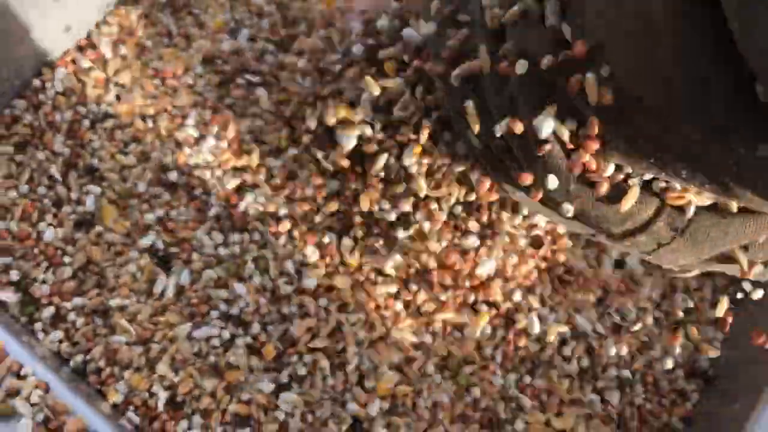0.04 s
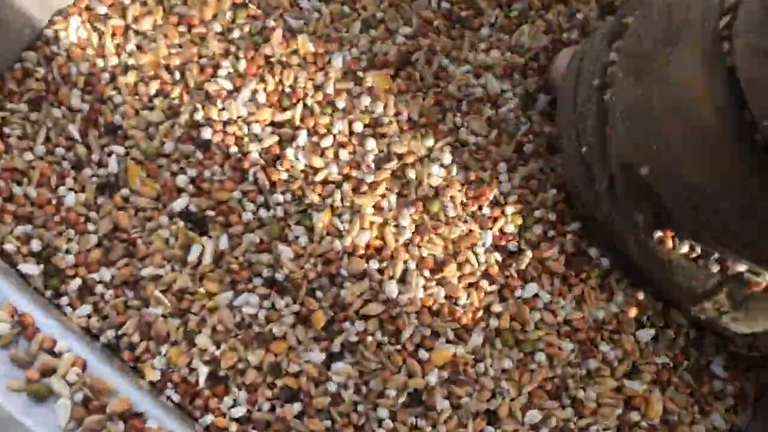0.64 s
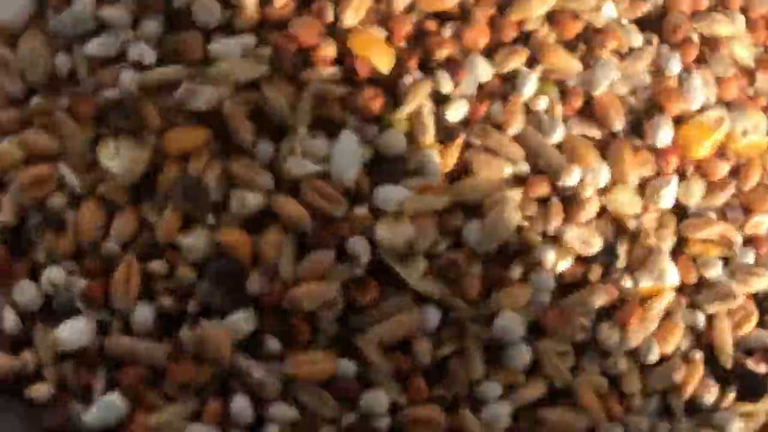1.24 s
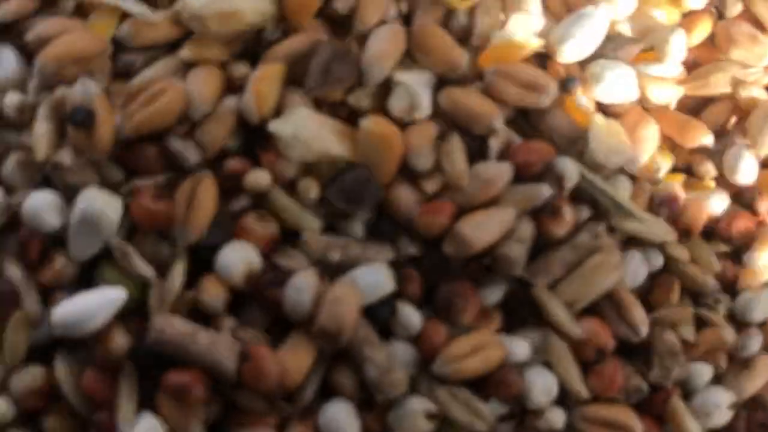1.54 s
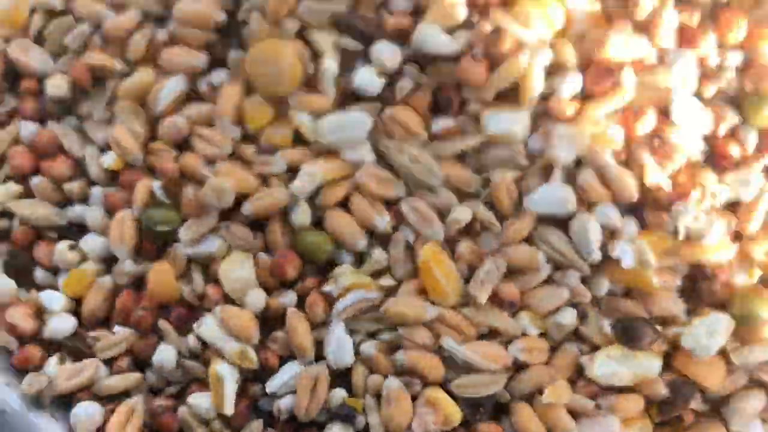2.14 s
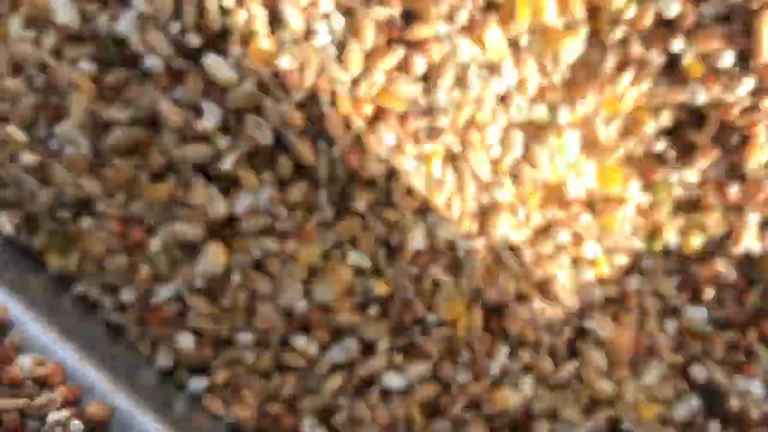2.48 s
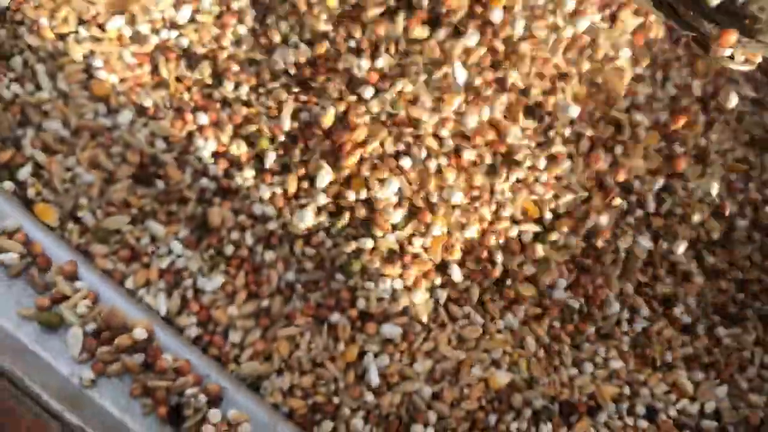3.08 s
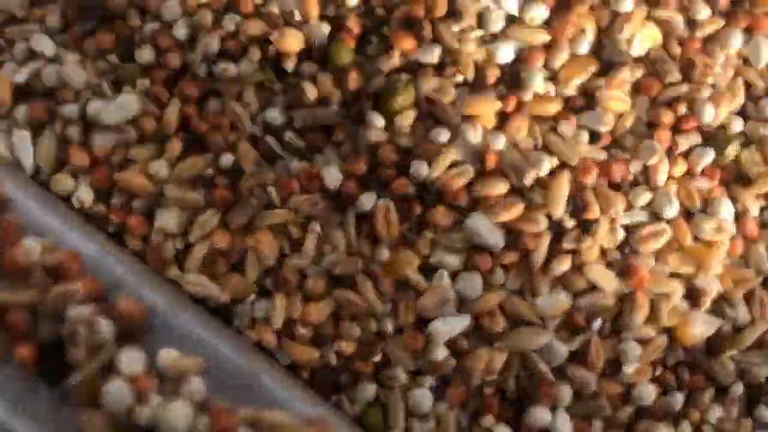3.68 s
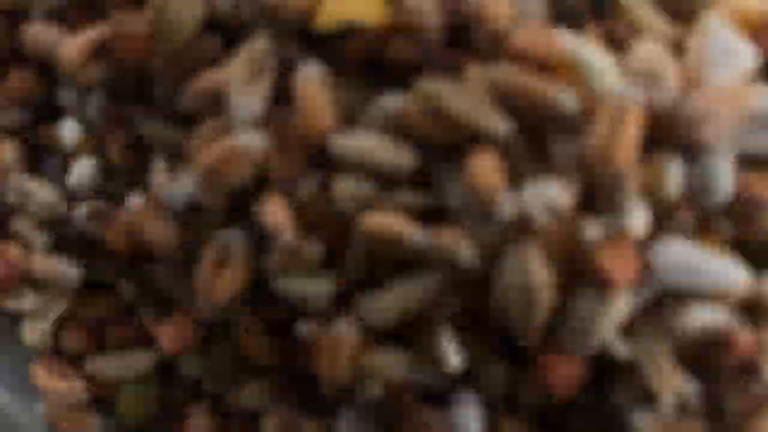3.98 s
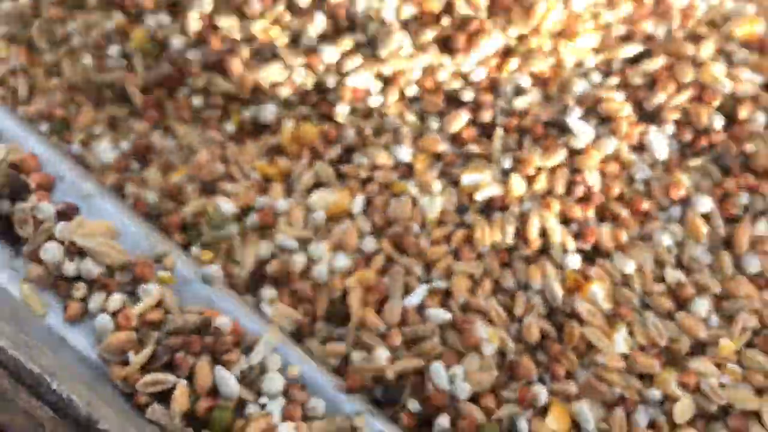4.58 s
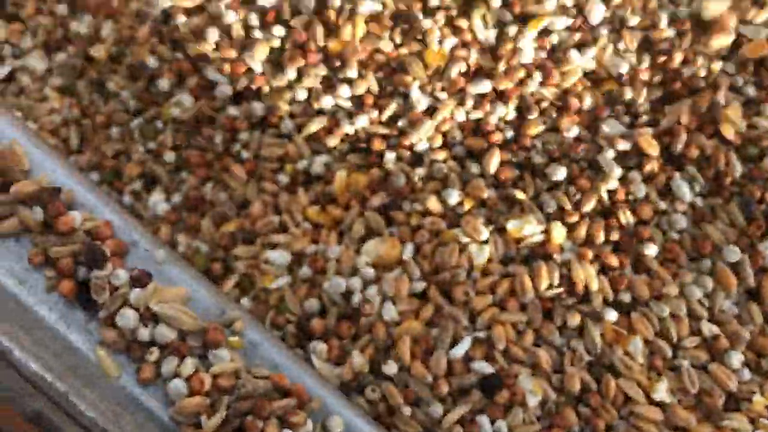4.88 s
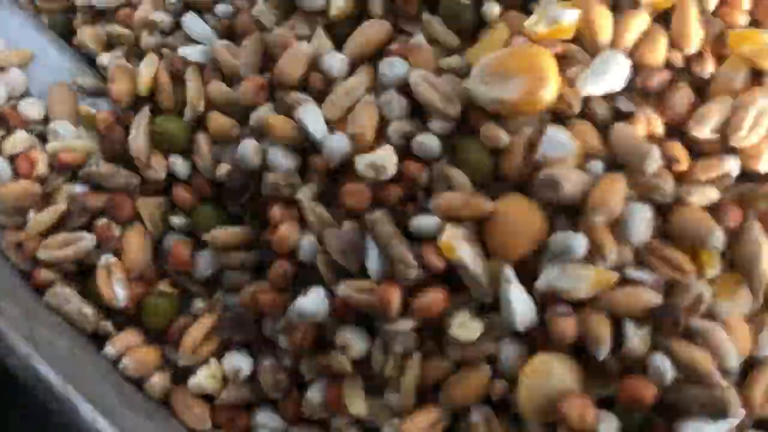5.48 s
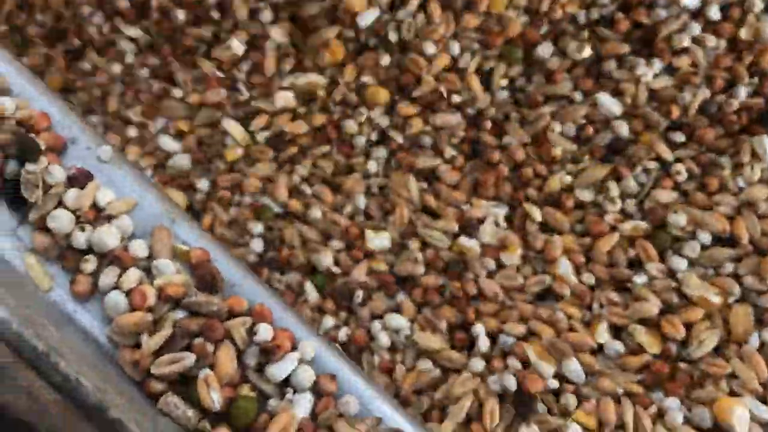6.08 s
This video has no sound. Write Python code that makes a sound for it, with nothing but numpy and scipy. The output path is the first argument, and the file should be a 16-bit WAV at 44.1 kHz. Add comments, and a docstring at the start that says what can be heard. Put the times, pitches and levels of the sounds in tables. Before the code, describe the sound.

A rubber boot stirs dry mixed grain in a metal bin, heard close and in mono over a dull yard rumble. It opens with a fading trickle and light seed ticks. At about 0.7 seconds a push brings a low crunch and a tiny clink, followed by soft knocks on the bin at 1.2. Rasping, hissing grain swells around 2 seconds with faint scrapes, then runs down the heap in a bright trickle near 2.8. More pushes crunch and rasp from 3.4 to 4.4, with soft knocks near 4.2 and sharp ticks just after. At 5 seconds a load drops onto the heap in a short rush. Further stirring follows, with a knock at 5.5 and a stronger hiss. A second load lands at about 6.2 seconds amid a cluster of sharp ticks.

```python
"""In a yard, close to a metal bin, a rubber boot stirs mixed dry grain, heard in mono.
Each push packs the seeds with a low crunch, slides them past each other with a rasp, and sends them
trickling down the heap in a bright hiss. All three are made of many tiny clicks of seed on seed.
Twice a load drops onto the heap. Stray seeds tick, scrape and clink, the bin knocks softly now and
then, and a dull rumble lies underneath."""
import sys
import numpy as np
from scipy import signal
from scipy.fft import rfft, irfft
from scipy.io import wavfile

SR = 44100
rng = np.random.default_rng(int(sys.argv[2]) if len(sys.argv) > 2 else 0)


def transcribe(u):
    """Save the signal u as a 16-bit wav file named by the first command-line argument.

    u: samples, shape (n,) or (channels, n), limited to [-1, 1]; the rate is SR.
    q: integer samples, one column per channel.
    """
    v = np.clip(np.atleast_2d(u).T, -1, 1)
    q = np.round(v * 32767).astype(np.int16)
    wavfile.write(sys.argv[1], SR, q)


N = 279153
TIME = np.arange(N) / SR


def from_db(db):
    """Turn decibels into a number to multiply by."""
    return 10 ** (np.asarray(db) / 20)


def together_db(amplitudes):
    """The level of unrelated movements heard at once: their powers add up."""
    return 10 * np.log10(sum(a ** 2 for a in amplitudes) + 1e-12)


def rms_one(x):
    """Scale a signal so that its average strength (rms) is 1."""
    return x / np.sqrt(np.mean(x ** 2) + 1e-20)


def at_hz(colour, hz):
    """Read the level in dB at a frequency from a table of tone colour."""
    frequencies, db = np.transpose(colour)
    return np.interp(np.log(hz), np.log(frequencies), db)


def passband(x, edges_hz, kind):
    """A gentle filter that keeps one "band", or only the "high" part."""
    sections = signal.butter(2, np.clip(edges_hz, 10, .45 * SR), kind, fs=SR, output="sos")
    return signal.sosfilt(sections, x + 1e-18)


def drift(rate_hz):
    """A smooth random wobble with a typical size of 1."""
    step, warm_up = 40, 2000
    pole = np.exp(-2 * np.pi * rate_hz * step / SR)
    noise = rng.standard_normal(N // step + warm_up + 2)
    slow = signal.lfilter([1], [1, -2 * pole, pole * pole], noise)[warm_up:]
    return np.interp(np.arange(N) / step, np.arange(len(slow)), rms_one(slow))


def husks(clicks, colour, bands, tilt_db):
    """Each click briefly rings the husk in several broad bands, each with a random strength."""
    edges = np.geomspace(colour[0][0], colour[-1][0], bands + 1)
    out = np.zeros(N)
    for low, high in zip(edges, edges[1:]):
        hz = np.sqrt(low * high)
        gain = from_db(at_hz(colour, hz) + tilt_db * np.log2(hz / np.median(edges)))
        out += passband(clicks * gain * rng.standard_normal(N), [low, high], "band")
    return out


def seeds(level_db, colour, per_s, spread_db, surge_db, crowding, bands, tilt_db=0):
    """Seeds touch in uneven clicks; crowding adds more in a strong flow. The tilt is in dB per octave."""
    chance = np.clip(per_s / SR * from_db(crowding * (level_db - np.mean(level_db))), 1e-4, 1)
    sizes = from_db(spread_db * np.minimum(rng.exponential(1, N), 5))
    clicks = (rng.random(N) < chance) * sizes / np.sqrt(chance)  # denser, but no louder
    return from_db(level_db) * rms_one(husks(clicks * from_db(surge_db), colour, bands, tilt_db))


def yard_rumble(level_db, top_hz):
    """The steady, dull background noise of the yard."""
    # tone colour of the rumble: (frequency [Hz], relative level [dB])
    colour = [(76, -25), (130, -2.5), (227, -2.5), (258, -10), (323, -11.5), (347, -15), (461, -16),
              (715, -13.5), (767, -18), (1010, -10), (1170, -12.5), (1350, -15.5), (2200, -25), (2860, -49),
              (4840, -120)]
    hz = np.maximum(np.arange(N // 2 + 1) * SR / N, 1)
    noise = irfft(rfft(rng.standard_normal(N)) * from_db(at_hz(colour, hz)), N)
    return from_db(level_db) * rms_one(passband(noise, [22, top_hz], "band"))


def bin_knocks(lowest_hz):
    """Soft blows make the full bin ring briefly; a longer contact sounds rounder."""
    # blows on the bin: (time [s], relative level [dB], contact time [s])
    knocks = [(1.212, -20, 0.0037), (1.231, -21.5, 0.0023), (1.254, -18.5, 0.0046), (4.149, -20.5, 0.0021),
              (4.221, -32, 0.0025), (4.235, -24.5, 0.0039), (5.480, -24.5, 0.0014), (5.495, -14.5, 0.0017),
              (5.638, -30, 0.0034)]
    # the bin's tones, damped by its load: (frequency [Hz], gain [dB], time to fade by 60 dB [s])
    tones = [(100, -35, 0.22), (153.7, -4, 0.24), (232.6, 8.5, 0.053), (283, -9, 0.031), (443, -11, 0.051)]
    blows, out = np.zeros((2, N))
    for start_s, db, contact_s in knocks:
        push = np.sin(np.pi * np.clip((TIME - start_s) / contact_s, 0, 1)) ** 2
        blows += from_db(db) * push / push.sum()
    force = passband(blows, lowest_hz, "high")
    for hz, db, ring_s in tones:
        decay = from_db(-60 / (ring_s * SR))
        angle = 2 * np.pi * hz / SR
        feedback = [1, -2 * decay * np.cos(angle), decay * decay]
        out += from_db(db) * signal.lfilter([0, np.sin(angle)], feedback, force)
    return out


def clinks():
    """Hard seeds hit metal, and each hit rings briefly at one pitch."""
    # hits on metal: (time [s], pitch [Hz], peak level [dB], time to fade by 60 dB [s])
    hits = [(0.830, 2230, -32, .04), (3.198, 2550, -41, .01)]
    out = np.zeros(N)
    for start_s, hz, peak_db, ring_s in hits:
        age = np.clip(TIME - start_s, 0, 1)
        out += from_db(peak_db - 60 * age / ring_s) * np.sin(2 * np.pi * hz * age)
    return out


def scrapes():
    """Seeds dragged along a hard surface ring it at one pitch, swelling and fading."""
    # short drags: (middle [s], length [s], pitch [Hz], band width [Hz], level [dB])
    drags = [(1.748, 0.3, 3200, 350, -48), (1.88, 0.57, 4370, 282, -45.5), (2.115, 0.23, 2880, 600, -41),
             (2.06, 0.23, 5450, 600, -43), (2.545, 0.1412, 5450, 450, -49),
             (3.525, 0.094, 3310, 450, -44.5), (4.38, 0.21, 5500, 700, -38.5),
             (5.316, 0.86, 5660, 930, -44.5), (6.251, 0.29, 3590, 544, -41.5)]
    out = np.zeros(N)
    friction = rng.standard_normal(N)
    for middle_s, length_s, hz, width_hz, db in drags:
        arch = np.cos(np.pi * np.clip((TIME - middle_s) / length_s, -.5, .5))
        ring = signal.lfilter(*signal.iirpeak(hz, hz / width_hz, fs=SR), friction)
        out += from_db(db) * arch * rms_one(ring)
    return out


def stray_seeds(chatter_s, chatter_db, body_gain_db):
    """A falling seed lands with one sharp snap, then jostles its neighbours for a moment."""
    # single seeds bouncing nearby: (time [s], relative snap level [dB], relative body level [dB])
    ticks = [(0.2847, -28, -37), (0.4249, -29, -31), (0.4383, -28, -35), (0.4952, -35, -34),
             (0.5741, -23, -37), (0.614, -22.5, -38), (0.6934, -31, -47), (0.775, -31, -47),
             (0.8609, -29, -43), (1.6843, -28, -37), (1.9537, -24, -26), (2.204, -24, -27),
             (3.198, -28, -32), (3.302, -27, -43), (3.4255, -29, -46), (3.4571, -24, -52),
             (3.4639, -27, -35), (4.4312, -14.5, -18.5), (4.4331, -16, -30), (4.4763, -21, -31),
             (4.5008, -23, -32), (4.7673, -26, -44), (4.8112, -26, -35), (4.8326, -27, -37),
             (4.8435, -23, -38), (4.8884, -31, -34), (4.8979, -24, -41), (4.9997, -26, -34),
             (5.2959, -22, -26), (6.1245, -19, -30), (6.1617, -20, -26), (6.1891, -17, -21),
             (6.2021, -18, -22)]
    snaps, bodies = np.zeros((2, N))
    age = TIME[:SR // 100]
    for start_s, snap_db, body_db in ticks:
        at = round(start_s * SR)
        touch = from_db(chatter_db) * np.exp(-age / chatter_s) * rng.standard_normal(len(age))
        touch[0] = 1  # the first hit
        snaps[at:at + len(age)] += touch * from_db(snap_db)
        bodies[at:at + len(age)] += touch * from_db(body_db + body_gain_db)
    return passband(snaps, 7000, "high") - passband(bodies, [1100, 6000], "band")


def leaping_seeds(spilled_db):
    """A few seeds leap clear of the trickle and land harder."""
    # tone colour of their ticks: (frequency [Hz], relative level [dB])
    colour = [(2500, -45), (6000, -16.5), (10000, -29), (16500, 30)]
    return seeds(spilled_db, colour, per_s=70, spread_db=1, surge_db=.7 * drift(5.3), crowding=.7, bands=4)


def shifting_heap(rest_db):
    """The whole mass of grain rumbles, and more loudly when it slumps."""
    # slumps of the heap: (middle [s], half length [s], level [dB])
    slumps = [(0.96, 0.13, -39), (1.793, .1, -39.5), (2.798, 0.12, -41.5), (3.35, 0.26, -45.5),
              (3.663, 0.037, -34), (3.875, 0.14, -37.5), (4.353, 0.7, -44.5), (5.226, 0.036, -33),
              (5.555, 0.33, -39)]
    # tone colour of the moving mass: (frequency [Hz], relative level [dB])
    colour = [(36, 8), (48, 5.5), (62, 11), (82, 12), (105, 5.5), (140, -10)]
    swells = [from_db(db) * np.exp(-((TIME - middle_s) / half_s) ** 2) for middle_s, half_s, db in slumps]
    level_db = together_db([from_db(rest_db), *swells])
    return seeds(level_db, colour, per_s=3000, spread_db=-.5, surge_db=.5 * drift(3.1),
                 crowding=.2, bands=5)


def landing_rush(dropped_db):
    """The heap sounds hollow where a load of grain lands."""
    # tone colour of the rush: (frequency [Hz], relative level [dB])
    colour = [(500, -46), (720, 5), (900, -11), (1130, -3), (1400, -7.5), (1900, -18)]
    return seeds(dropped_db, colour, per_s=830, spread_db=3.5, surge_db=2 * drift(34.4),
                 crowding=.2, bands=7)


def swell(start_s, rise_s, hold_s, fade_s, steepness=1.05):
    """A movement gathers speed, keeps it, then dies away; a steeper fade lingers less."""
    rise = np.sin(np.pi / 2 * np.clip((TIME - start_s) / rise_s, 0, 1)) ** 1.4
    fading_s = np.maximum(TIME - start_s - rise_s - hold_s, 0)
    return rise * np.exp(-(fading_s / fade_s) ** steepness)


def flows():
    """How strongly seeds are packed, slid, spilled and dropped over time, in relative dB."""
    # boot pushes; deep ones crunch, shallow ones rasp and hiss:
    # (start [s], rise [s], hold [s], fade [s], crunch [dB], rasp [dB], hiss [dB])
    pushes = [(0.411, .014, 0.023, 0.01, -57, -42, -41.5), (0.455, 0.04, 0.023, 0.015, -53, -46, -48),
              (0.655, 0.11, 0.097, 0.21, -34.5, -44.5, -52), (0.97, 0.21, .07, 0.4, -40.5, -37, -44),
              (1.299, .75, .1, .2, -45, -36, -40.5), (2.142, 0.27, 0.045, 0.2, -44.5, -35.5, -38.5),
              (3.445, 0.15, 0.088, 0.18, -35, -40, -40), (3.733, .14, .02, 0.2, -37.5, -32, -36.5),
              (3.855, 0.3, .26, 0.093, -45, -36, -37), (5.249, 0.098, 0.043, 0.26, -43, -37.5, -37),
              (5.519, 0.097, 0.085, .14, -58, -38, -36), (5.953, 0.15, 0.028, 0.13, -67.5, -45, -51.5)]
    # loads dropping onto the heap: (start [s], rise [s], hold [s], fade [s], level [dB])
    landings = [(5.024, 0.024, 0.089, .15, -30), (6.178, .06, 0.02, 0.064, -29.5)]
    # loose seeds running down the slope: (start [s], rise [s], hold [s], fade [s], level [dB])
    spills = [(-0.1, 0.083, 0.058, 0.67, -39), (2.32, 0.51, 0.055, 0.65, -36),
              (3.202, 0.078, 0.067, 0.02, -38.5), (4.248, 0.18, 0.071, 0.34, -37),
              (4.653, 0.18, 0.13, 0.24, -37.5), (5.213, 0.073, .22, 0.33, -37.5),
              (5.604, 0.11, .02, 0.21, -34.5), (5.867, 0.18, 0.4, .2, -34)]
    packing_lag_s, landing_lag_s = .013, .02  # seeds slide first, then jam and crunch
    packed, slid, spilled = [from_db(-56.5)], [from_db(-52.5)], [from_db(-64)]  # never quite at rest
    dropped = []
    for start_s, rise_s, hold_s, fade_s, crunch_db, rasp_db, hiss_db in pushes:
        push = swell(start_s, rise_s, hold_s, fade_s)
        packed.append(from_db(crunch_db) * swell(start_s + packing_lag_s, rise_s, hold_s, fade_s))
        slid.append(from_db(rasp_db) * push)
        spilled.append(from_db(hiss_db) * push)
    for start_s, rise_s, hold_s, fade_s, db in landings:
        load = from_db(db) * swell(start_s, rise_s, hold_s, fade_s)
        slid.append(load)
        packed.append(from_db(db - 8) * swell(start_s + landing_lag_s, rise_s, hold_s, fade_s))
        dropped.append(from_db(-5) * load)
        spilled.append(from_db(db + .5) * swell(start_s, rise_s, hold_s, fade_s=.098))
    for start_s, rise_s, hold_s, fade_s, db in spills:
        spilled.append(from_db(db) * swell(start_s, rise_s, hold_s, fade_s, steepness=1.53))
    return [together_db(flow) for flow in (packed, slid, spilled, dropped)]


def small_slips(per_s, settle_s):
    """Tiny avalanches start suddenly and settle quickly; the result has a typical size of 1."""
    starts = (rng.random(N) < per_s / SR) * rng.uniform(.25, 1, N)
    loose = signal.lfilter([1], [1, -np.exp(-1 / (settle_s * SR))], starts + 1e-18)
    return rms_one(np.sqrt(loose) - np.mean(np.sqrt(loose)))


def boot_echo(x, delay_s, wander, rate_hz, echo_db):
    """The moving boot throws back a close echo, so the tone colour keeps shifting."""
    lag_s = delay_s * np.exp(wander * drift(rate_hz))
    return x + from_db(echo_db) * np.interp(TIME - lag_s, TIME, x)


def stirred_grain(packed_db, slid_db, spilled_db):
    """Packed seeds crunch, sliding layers rasp and the surface hisses; the same slips stir all three."""
    # tone colour of seeds packed under the sole: (frequency [Hz], relative level [dB])
    crunch_colour = [(90, 12), (125, 6.5), (180, 3.5), (270, 5.5), (420, -1), (650, -1), (1000, -6),
                     (1500, -13), (2500, -27.5)]
    # tone colour of sliding layers: (frequency [Hz], relative level [dB])
    rasp_colour = [(600, -2), (1100, 1.5), (1600, 1), (2400, -1), (3300, 1.5), (4200, 2), (5600, -0.5),
                   (7500, -2.5), (10000, -5.5), (14000, -13)]
    # tone colour of the surface trickle: (frequency [Hz], relative level [dB])
    hiss_colour = [(3500, -17), (5500, -9.5), (7500, -8), (9300, -2.5), (12000, -1), (14000, 0.5),
                   (16500, 3)]
    slips = small_slips(per_s=150, settle_s=.00058)
    # buried sliding is muffled; it brightens as the surface starts to run
    surface_db = spilled_db - np.mean(spilled_db)
    crunch = seeds(packed_db, crunch_colour, per_s=1000, spread_db=1.5,
                   surge_db=.72 * slips + .56 * drift(19), crowding=.5, bands=12)
    rasp = seeds(slid_db, rasp_colour, per_s=6000, spread_db=1.5,
                 surge_db=.32 * slips, crowding=1, bands=14, tilt_db=.26 * surface_db)
    hiss = seeds(spilled_db, hiss_colour, per_s=14000, spread_db=3,
                 surge_db=slips + .5 * drift(47), crowding=.8, bands=9)
    rasp = boot_echo(rasp, delay_s=.0011, wander=.25, rate_hz=1.2, echo_db=-13)
    return from_db(1.5) * crunch + from_db(.14) * rasp + from_db(.33) * hiss


def scene():
    """Everything reaches one microphone, so both channels are alike."""
    packed_db, slid_db, spilled_db, dropped_db = flows()
    ticks = from_db(14.5) * stray_seeds(chatter_s=.001, chatter_db=-15, body_gain_db=-.3)
    knocks = from_db(-2.5) * bin_knocks(lowest_hz=115)
    leaps = from_db(-16) * leaping_seeds(spilled_db)
    grain = stirred_grain(packed_db, slid_db, spilled_db) + scrapes() + leaps + ticks + clinks()
    heap = shifting_heap(rest_db=-45.5) + landing_rush(dropped_db)
    mono = grain + heap + knocks + yard_rumble(level_db=-45, top_hz=2460)
    return np.stack([mono, mono])


def record(dry):
    """The microphone weakens three narrow bands of treble, and the very top is cut off."""
    # dips in the microphone's response: (frequency [Hz], width [Hz], share removed [0-1])
    dips = [(4920, 140, 0.65), (7680, 150, 0.42), (10490, 620, 0.57)]
    cutoff_hz = 15900
    for hz, width_hz, share in dips:
        dry = dry - share * signal.lfilter(*signal.iirpeak(hz, hz / width_hz, fs=SR), dry)
    return signal.sosfilt(signal.ellip(12, .2, 80, cutoff_hz, fs=SR, output="sos"), dry)


dry = scene()
out = record(dry)
transcribe(out)
```